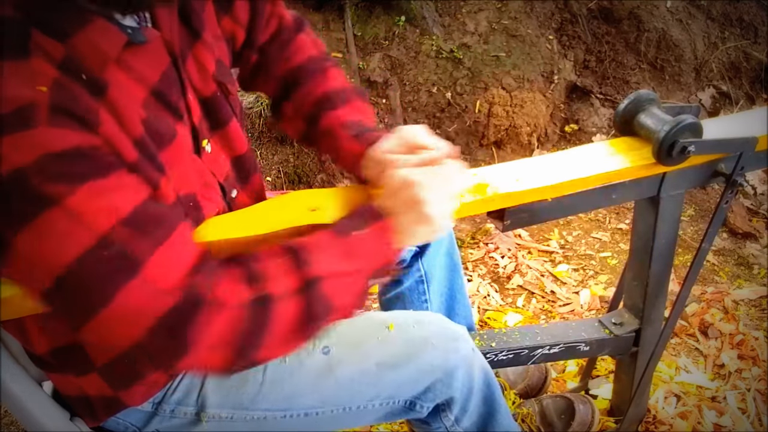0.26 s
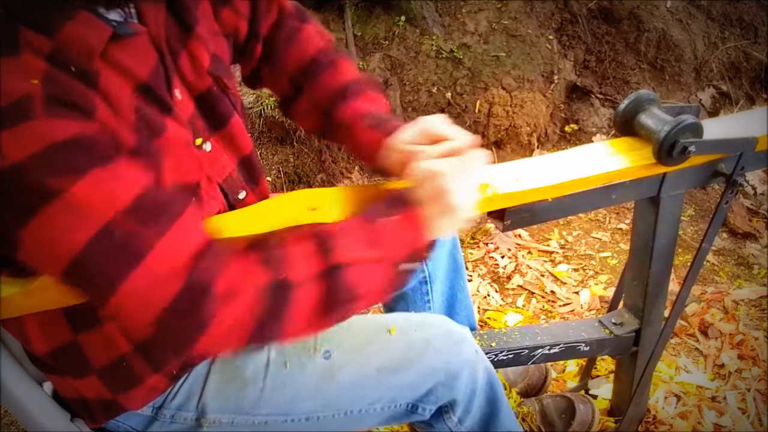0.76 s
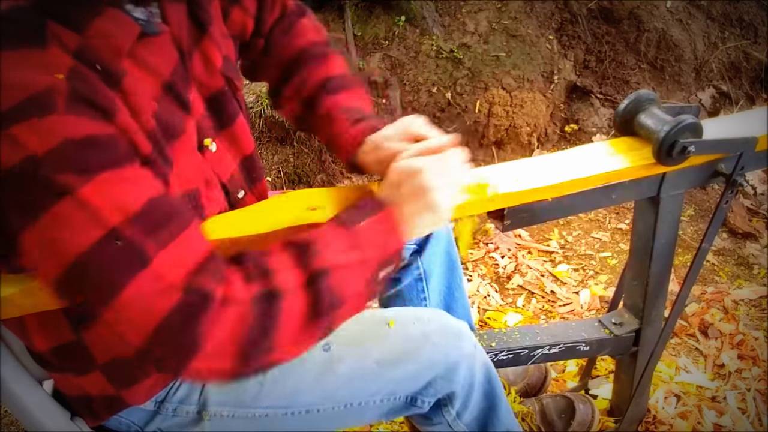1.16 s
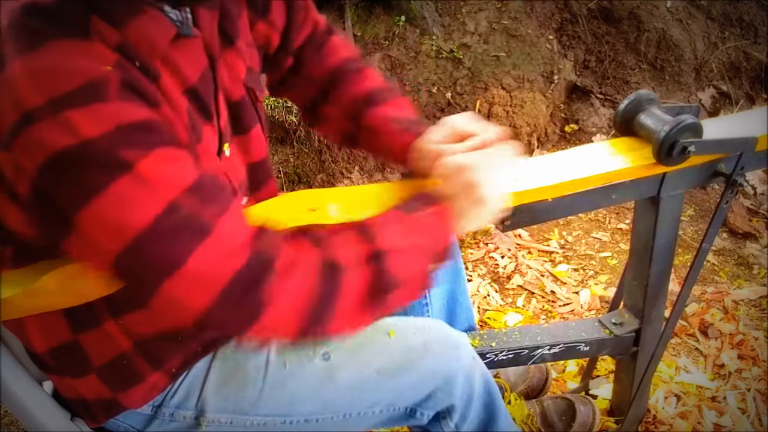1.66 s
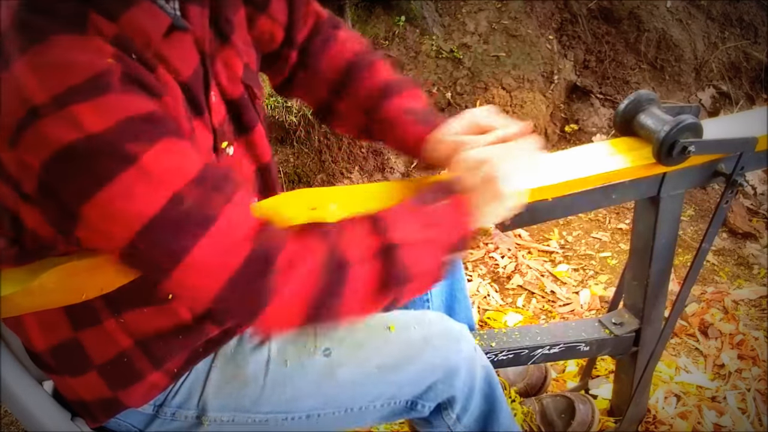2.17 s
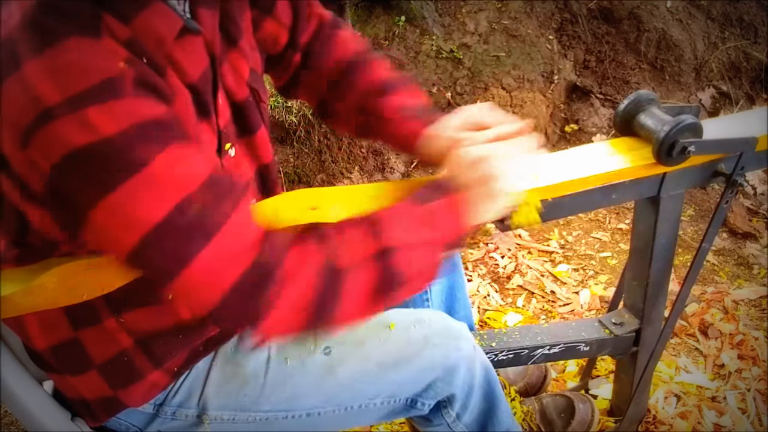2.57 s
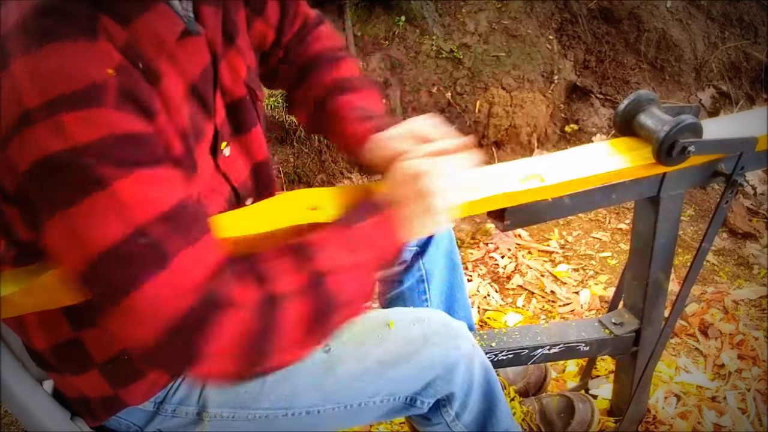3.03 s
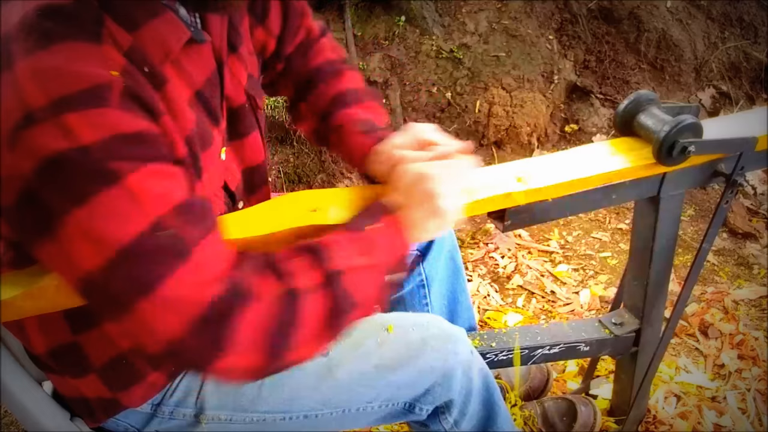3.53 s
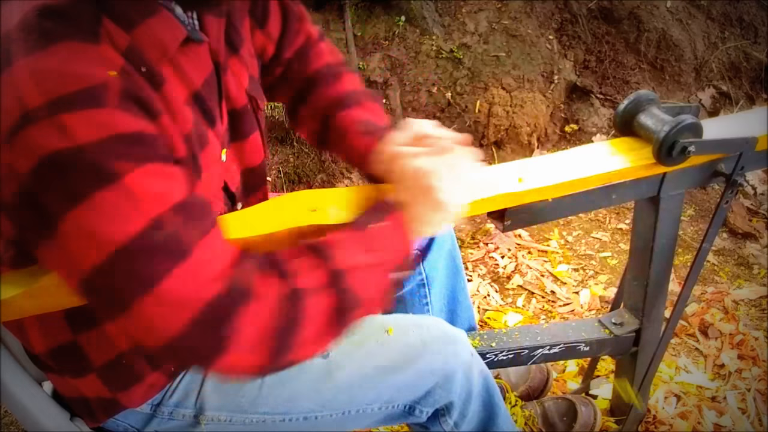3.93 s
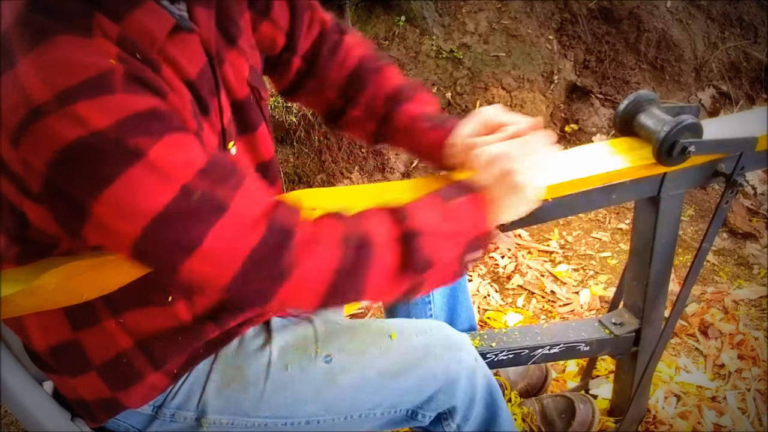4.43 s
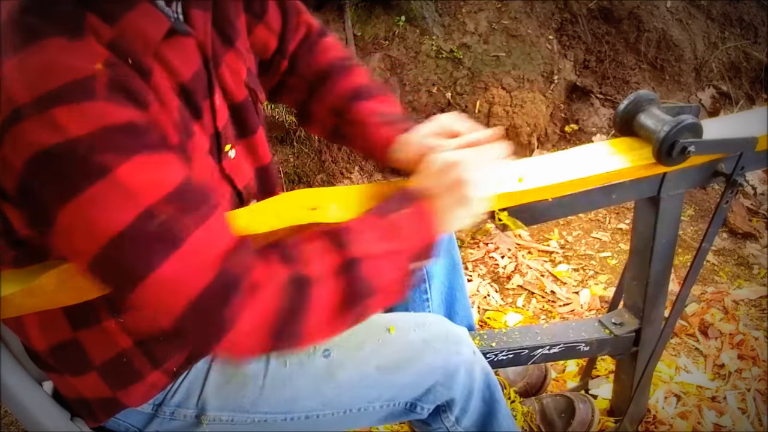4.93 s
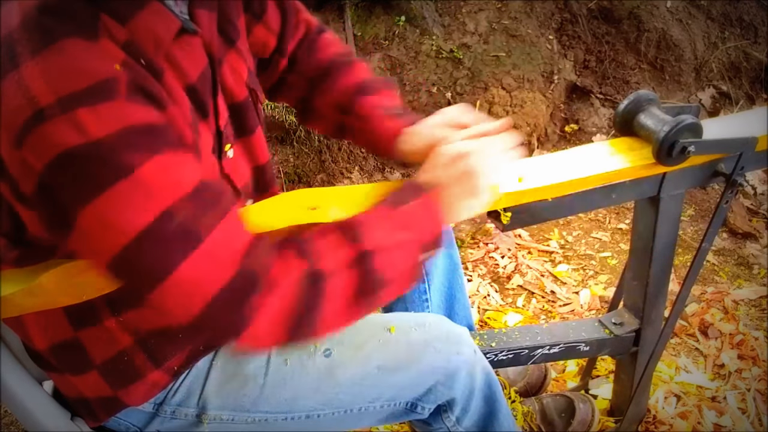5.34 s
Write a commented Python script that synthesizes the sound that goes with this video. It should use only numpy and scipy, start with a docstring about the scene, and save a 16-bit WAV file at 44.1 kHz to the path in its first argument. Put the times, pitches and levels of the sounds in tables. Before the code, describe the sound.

Close, dry, rhythmic scraping of wood outdoors: knock, rasping pull, brief gap, repeated briskly, while low wind puffs thump the microphone.

```python
"""Outdoors, close to a small camera: a hand-held steel scraper on a wooden stave clamped on a trestle.
Distant ambience (shaped noise) runs throughout; wind puffs (low noise swelling and fading) buffet the microphone.
It opens with the edge already in the wood: noise for the tearing fibres, also driving the body modes.
Then, about three times a second, the blade lands (thud, decaying modes, skid), twice just after a faint touch,
and pulls another stroke; in most, the edge catches on hard grain, a pitched chatter of a few milliseconds."""
import sys
import numpy as np
from scipy import signal
from scipy.fft import rfft, irfft, next_fast_len
from scipy.io import wavfile
from scipy.ndimage import uniform_filter1d, map_coordinates

SR = 44100
rng = np.random.default_rng(int(sys.argv[2]) if len(sys.argv) > 2 else 0)


def transcribe(signal):
    """Save signal, clipped to [-1, 1], as a 16-bit WAV file at the path in sys.argv[1]."""
    frames = np.atleast_2d(signal).T
    limited = np.clip(frames, -1, 1)
    pcm = np.round(limited * 32767).astype(np.int16)
    wavfile.write(sys.argv[1], SR, pcm)


def volts_from_decibels(level):
    """Turn decibel levels (scalar or array-like) into linear amplitude factors."""
    exponent = np.asarray(level, float) / 20
    return 10 ** exponent


N = 246959

# modes of stave and blade together: f/Hz, width/Hz, relative level/dB when scraped, the same when struck
BODY_MODES = [(438, 40.5, -9.5, -55), (554, 62, -6.5, 6), (666, 81.5, -3, 6.5), (878, 115, -14, -35),
              (1029, 61, -7, -21), (1226, 102, -7.5, -6), (1476.5, 120, -7, 3.5), (1600, 71, -2.5, -31),
              (1777, 99, -2.5, 4.5), (2206, 80, -7, -26), (2327, 64, -10.5, -12), (2610, 208, -9.5, -4),
              (2780, 135, -7, -24), (2870, 110, -4, -13), (3248, 115, -10, -10), (3740, 70, -41.5, -46),
              (4174, 98, -16, -44), (4590, 139, -11.5, -33), (5167, 454, -18, 2), (5965, 130, -17.5, -18)]
# colour of tearing fibres as the camera's microphone hears it: f/Hz, relative density level/dB
FIBRE_COLOUR_AT_MIC = [(150, -43), (250, -15), (476, -9.5), (663, -2), (891, -2.5), (1380, -2.5),
                       (1610, -2.5), (1990, -6.5), (2760, -8.5), (3470, -8), (6950, -14.5), (8870, -15),
                       (10200, -36.5), (16000, -29)]


def along(points, hz):
    """(f/Hz, level/dB) points read on a log frequency axis, as gain."""
    f, level_db = np.transpose(points)
    return volts_from_decibels(np.interp(np.log(hz + 1), np.log(f + 1), level_db))


def unit(x):
    """Scaled to rms 1."""
    return x / np.sqrt(np.mean(x ** 2) + 1e-20)


def filtered(x, response):
    """x times a complex response of frequency."""
    m = next_fast_len(N + SR // 2)
    spectrum = rfft(x, m) * response(np.fft.rfftfreq(m, 1 / SR))
    return irfft(spectrum, m)[:N]


def wobble(rate):
    """A smooth random curve, rate knots a second."""
    knots = rng.standard_normal(int(N * rate / SR) + 4)
    return map_coordinates(knots, [np.arange(N) * rate / SR])


def coloured_at_random(x, depth_db, bins, frames):
    """Random gain patches, bins by frames wide, in a short-time spectrum (frames 2.9 ms apart)."""
    z = signal.stft(x, nperseg=256)[2]
    across_hz = uniform_filter1d(rng.standard_normal(z.shape), size=bins, axis=0)
    field = uniform_filter1d(across_hz, size=frames, axis=1)
    return signal.istft(z * volts_from_decibels(depth_db * unit(field)), nperseg=256)[1][:N]


def patchy(x, depth_db):
    """Small, quick patches of gain over time and frequency: the colour keeps shifting."""
    return coloured_at_random(x, depth_db, bins=2, frames=5)


def wandering(x, depth_db):
    """Broad colour shifts over about a tenth of a second, as the blade travels along the stave."""
    return coloured_at_random(x, depth_db, bins=4, frames=30)


def ambience():
    """Faint, steady distant outdoor noise."""
    # colour as the camera's microphone hears it: f/Hz, relative density level/dB
    distant_colour = [(40, -30), (90, -8), (165, -5.5), (280, -10), (400, -7.5), (620, -1), (950, -8),
                      (1350, -19.5), (1800, -23.5), (3000, -23.5), (5000, -26.5), (7000, -28), (8800, -31),
                      (10200, -51), (16000, -32), (16300, -57)]
    noise = patchy(rng.standard_normal(N), depth_db=1.5)
    return volts_from_decibels(-47.5) * unit(filtered(noise, lambda f: along(distant_colour, f)))


def wind():
    """Puffs of wind on the microphone: low-frequency flutter that swells and fades with each puff."""
    # puffs: t/s, level/dB at the height, length/ms within 6 dB of the height
    puffs = [(0.07, -46, 40), (0.18, -44, 50), (0.292, -49, 45), (0.52, -54, 35), (1.801, -28.5, 46),
             (1.94, -29.5, 75), (2.092, -30, 57), (2.262, -30, 40), (2.331, -26.5, 33), (2.5, -44, 112),
             (2.678, -41, 82), (2.82, -51, 110), (2.91, -37, 73), (3.065, -26.5, 45), (3.152, -34.5, 50),
             (3.249, -31.5, 45), (3.338, -29.5, 57), (3.388, -31, 50), (3.53, -39, 70), (3.69, -32, 98),
             (3.92, -37, 40), (3.98, -36, 50), (4.058, -34, 55), (4.2, -35.5, 60), (4.38, -47, 50),
             (4.51, -50, 70), (4.622, -26, 32), (4.68, -32.5, 60), (4.75, -20, 40), (4.818, -19, 34),
             (5.0, -52, 120), (5.488, -41, 42)]
    # flutter as the camera's microphone hears it: f/Hz, relative density level/dB
    flutter_colour = [(12, -36), (20, -4), (38, 0), (59, 3), (73, -6), (130, -40), (170, -57.5),
                      (290, -120)]
    calm_db, evenness = -59, 0.49  # evenness: how far the flutter keeps a steady size, 0-1
    t = np.arange(N) / SR
    strength = volts_from_decibels(calm_db)
    for s, db, ms in puffs:
        half_lengths = 2000 * (t - s) / ms
        strength = strength + volts_from_decibels(db - 6 * half_lengths ** 2)
    flutter = filtered(rng.standard_normal(N), lambda f: along(flutter_colour, f))
    size = np.sqrt(np.abs(uniform_filter1d(flutter ** 2, size=SR // 40))) + 1e-9
    return strength * unit(flutter / size ** evenness)


def surroundings(x):
    """Trestle, ground and trees send back a short, weak smear: x convolved with decaying noise."""
    t = np.arange(SR // 3) / SR
    tail = rng.standard_normal(len(t)) * volts_from_decibels(-60 * t / 0.17)  # falls 60 dB in 0.17 s
    delayed = np.pad(x, (150, 0))  # 150 samples, 3.4 ms
    return signal.fftconvolve(delayed, tail / np.linalg.norm(tail))[:N]


def tearing(spread_db, lumps_db):
    """Dense fibre breaks of uneven size, in clumps a few milliseconds long."""
    unevenness = np.minimum(rng.exponential(size=N), 4)
    breaks = rng.standard_normal(N) * volts_from_decibels(spread_db * unevenness)
    return breaks * volts_from_decibels(lumps_db * wobble(180))


def scraped(f):
    """Response of the body modes to a steady stream of small forces: resonances of alternating sign."""
    total = 0
    for k, (centre, width, db, _) in enumerate(BODY_MODES):
        resonance = 1j * f * width / (centre * centre - f * f + 1j * f * width)
        total = total + (-1) ** k * volts_from_decibels(db) * resonance
    return total


def landings():
    """The blade lands on the wood with thud, ring and skid; two faint touches come just before landings."""
    # t/s, relative thud level/dB, relative ring level/dB, relative skid level/dB, skid length/s
    touches_and_landings = [(0.257, -6.5, -18.5, -31, 0.0092), (0.56, -11.5, -27, -33, 0.023),
                            (0.9, -8, -20.5, -34, 0.017), (1.238, -7, -17, -35, 0.014),
                            (1.551, -10, -22, -34, 0.035), (1.892, -5.5, -20, -29, 0.027),
                            (2.261, -11, -19.5, -33.5, 0.041), (2.69, -4.5, -17.5, -36, 0.026),
                            (3.101, -6.5, -24.5, -35.5, 0.018), (3.492, -9, -18.5, -39.5, 0.013),
                            (3.881, -8.5, -19, -32, 0.018), (4.238, -42, -56, -53, 0.011),
                            (4.288, -9.5, -22.5, -36, 0.022), (4.613, -45, -60.5, -52, 0.0133),
                            (4.654, -4.5, -20, -31.5, 0.025), (5.032, -17, -30, -36.5, 0.0286),
                            (5.418, -11, -19.5, -32.5, 0.028)]
    struck, skid = np.zeros(N + SR), np.zeros(N + SR)
    t = np.arange(SR // 5) / SR
    hz, width, _, struck_db = np.transpose(BODY_MODES)[:, :, None]
    for s, thud_db, ring_db, skid_db, skid_s in touches_and_landings:
        chance_db = rng.normal(0, 2.5, hz.shape)
        level_db = struck_db + np.where(hz < 1100, thud_db - 15, ring_db + 1.0) + chance_db
        pitch = hz * (1 + rng.normal(0, 0.022, hz.shape))  # the grip and the landing spot change a little
        phase = rng.normal(0, 1.0, hz.shape)
        decay = np.exp(-np.pi * 0.7 * width * t)
        ring = volts_from_decibels(level_db) * decay * np.sin(2 * np.pi * pitch * t + phase)
        onset = 1 - np.exp(-t / 0.0015)
        # the soft blow itself, a few cycles long
        push = volts_from_decibels(thud_db + 10.5) * t / 0.002 * np.exp(-t / 0.0011) * np.sin(2 * np.pi * 760 * t)
        start = round(s * SR)
        struck[start:][:len(t)] += ring.sum(0) * onset + push
        skid_shape = np.exp(-(t / skid_s) ** 1.55) * (1 - np.exp(-t / 0.0035))
        skid[start:][:len(t)] += volts_from_decibels(skid_db) * skid_shape

    def scuff_response(f):
        return along(FIBRE_COLOUR_AT_MIC, f) * f / (f + 2500) / (1 + (f / 9000) ** 2)

    scuff = unit(filtered(tearing(spread_db=1.5, lumps_db=2.5), scuff_response))
    rattle = unit(filtered(tearing(spread_db=4.5, lumps_db=3.0), scraped))
    return struck[:N] + skid[:N] * (volts_from_decibels(-1) * scuff + volts_from_decibels(7) * rattle)


def catches():
    """The edge catches on hard grain: chatter swells and dies in milliseconds, a pitch and a rough neighbour."""
    # t/s, relative level/dB, chatter f/Hz
    hard_grain = [(0.0274, -3, 1713), (0.428, -11, 1800), (1.333, -7.5, 2870), (1.365, -9, 2940),
                  (2.0218, -3.5, 1636), (2.4306, 3, 1620), (2.467, 1.5, 2684), (2.4942, 3, 2780),
                  (2.8894, -8, 1650), (3.25, -6, 1830), (3.6388, -9, 1720), (4.7506, -16, 1830),
                  (4.802, -12, 1540), (4.8494, -3.5, 2130), (5.1908, 5, 1660), (5.5588, -2, 1600)]
    out, t = np.zeros(N + SR), np.arange(SR // 20) / SR
    for s, db, hz in hard_grain:
        detune, phase = rng.uniform(-0.94, 1, size=2)
        main = np.sin(2 * np.pi * hz * t + 3 * phase)
        neighbour = 0.66 * np.sin(2 * np.pi * hz * (1 + 0.16 * detune) * t)
        swell = t / 0.0053 * np.exp(-t / 0.0026)
        out[round(s * SR):][:len(t)] += volts_from_decibels(db) * (main + neighbour) * swell
    return out[:N]


def strokes():
    """The edge hisses, louder as the blade speeds up; the deeper it bites, the more it drives the modes."""
    # one row a stroke: edge bites t/s, blade fastest t/s, blade lifts t/s,
    # relative hiss level/dB at full speed, softer at the bite by level/dB
    pulls = [(-0.023, 0.058, 0.09, -28, 6), (0.31, 0.42, 0.42, -31, 1.5), (0.629, 0.711, 0.74, -27.5, 12.5),
             (0.959, 1.07, 1.103, -31.0, 1), (1.292, 1.358, 1.42, -25.5, 13.5),
             (1.627, 1.675, 1.761, -28.5, 19), (1.96, 2.029, 2.127, -25.5, 23),
             (2.359, 2.437, 2.507, -23, 15.5), (2.76, 2.877, 2.915, -24.0, 7),
             (3.167, 3.25, 3.32, -28.5, 5), (3.552, 3.63, 3.709, -26.5, 10.5),
             (3.951, 4.026, 4.103, -28, 8), (4.347, 4.371, 4.49, -31.0, 11.0),
             (4.713, 4.795, 4.849, -21.5, 22.5), (5.108, 5.199, 5.263, -23.5, 10.5),
             (5.492, 5.544, 5.67, -25.0, 11.5)]
    # how the blade is held, one row a stroke: finest sizzle gain level/dB, upper modes gain level/dB,
    # relative drive of the modes level/dB, loss while slowing down level/dB
    grip = [(-7, 3.5, 3, 6), (2.5, -3.5, 4.5, 4), (-5, 3, 3, 6), (1, -1.2, 4.5, 7.5), (-2.5, 4, 0.5, 6.5),
            (2.5, -3.5, 4, 5.5), (2, 1, 0, 7), (1, 3.5, 2.5, 3.5), (4, 4, -0.5, 5), (6.5, 1.4, 3, 6),
            (3.5, -0.5, 2.5, 5.5), (5, 1, -1.5, 5.5), (6, -0.5, 3, 2.5), (-4, 1, 4, 7), (0, 3.5, 1, 7.5),
            (-1, 4.5, 0, 5)]
    # the edge digs deeper for a moment and drives the modes harder: t/s, extra drive level/dB
    digs = [(0.031, 3.5), (0.331, 5.5), (0.434, 4.5), (0.672, 3), (0.763, 9), (0.993, 2.5), (1.328, 5.5),
            (1.41, 3), (1.636, 8), (1.777, 7.5), (1.99, 10), (2.042, 5.5), (2.147, 3.5), (2.433, 2),
            (2.791, 6.5), (2.905, 3.5), (3.202, 5.5), (3.574, 8), (3.637, 2), (3.985, 7), (4.395, 4.5),
            (4.447, 4), (4.752, 4), (5.147, 5), (5.195, 2.5), (5.578, 4.5)]
    bite_s, lift_s, dig_s = 45 / 1002, 45 / 530, 0.01  # rise into the bite, fall after the lift, dig spread
    # dB per dB of the stroke's swell: the modes swing less than the hiss, the sizzle more
    wood_follows, sizzle_follows = 0.69, 0.5
    hiss_extra_fall = 0.3  # after the lift the hiss falls further, dB per dB
    t = np.arange(N) / SR

    knots = []  # time, swell, fall after the lift, then the stroke's own settings
    for (bite, fastest, lift, full, soft), (sizzle, upper, wood, fade) in zip(pulls, grip):
        held = (full, sizzle, upper, wood)
        knots += [(bite - bite_s, -soft - 51, 0, *held),
                  (bite, -soft, 0, *held),
                  (fastest, 0, 0, *held),
                  (lift, -fade, 0, *held),
                  (lift + lift_s, -fade - 45, -45, *held)]
    times, *columns = np.array(knots).T
    curves = [np.interp(t, times, column) for column in columns]
    swell_db, lifted_db, full_db, sizzle_db, upper_db, wood_db = curves
    pressed_db = np.maximum(swell_db, -18)  # below this the edge is leaving the wood and everything fades alike
    dig_db = sum(db * np.exp(-0.5 * ((t - s) / dig_s) ** 2) for s, db in digs)
    grain = volts_from_decibels(1.2 * wobble(45))  # harder and softer growth rings pass under the edge

    fibres = patchy(tearing(spread_db=1.5, lumps_db=0.26), depth_db=4.0)
    hiss = unit(filtered(fibres, lambda f: along(FIBRE_COLOUR_AT_MIC, f) * f / (f + 2500)))
    sizzle = filtered(hiss, lambda f: 1 / (1 + (10000 / (f + 1)) ** 12))  # above 10 kHz
    hiss = hiss + (volts_from_decibels(sizzle_db + sizzle_follows * pressed_db) - 1) * sizzle
    hiss_db = full_db + swell_db + hiss_extra_fall * lifted_db + 1.5

    force = wandering(patchy(tearing(spread_db=1.5, lumps_db=1.1), depth_db=3.5), depth_db=2.0)
    upper_force = filtered(force, lambda f: 1 / (1 + (2400 / (f + 1)) ** 8))  # above 2.4 kHz
    force = force + (volts_from_decibels(upper_db) - 1) * upper_force
    force = force / np.std(filtered(force, scraped))
    drive_db = full_db + swell_db - (1 - wood_follows) * pressed_db + wood_db + dig_db
    modes = filtered(force * grain * volts_from_decibels(drive_db), scraped)
    return modes + hiss * grain * volts_from_decibels(hiss_db)


def scene():
    """Scraper close by, in front of ambience and wind; the thin stave radiates little bass."""
    contact = strokes() + catches() + landings()
    work = filtered(contact, lambda f: (1j * f / (1j * f + 220)) ** 2)
    return (work + volts_from_decibels(-10.5) * surroundings(work) + ambience() + wind())[None]


def band_limit(x):
    """A steep low-pass at the top of the band."""
    return signal.sosfilt(signal.butter(12, 16190, fs=SR, output="sos"), x)


def record(dry):
    """The camera's band limit: a gentle roll-off below 30 Hz and a steep one above 15.9 kHz."""
    mix = filtered(dry[0], lambda f: 1j * f / (1j * f + 30) / (1 + (f / 15900) ** 200))[None]
    return band_limit(mix)


dry = scene()
out = record(dry)
transcribe(out)
```